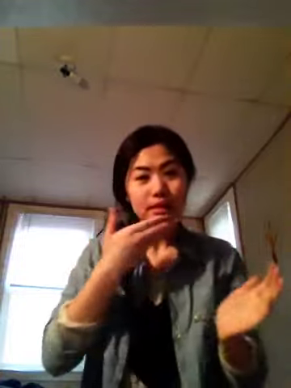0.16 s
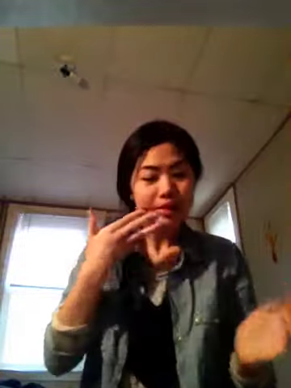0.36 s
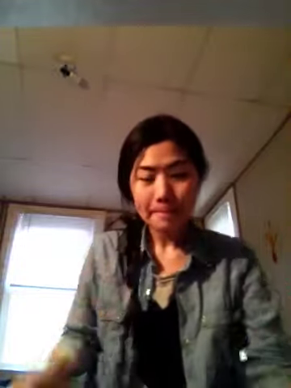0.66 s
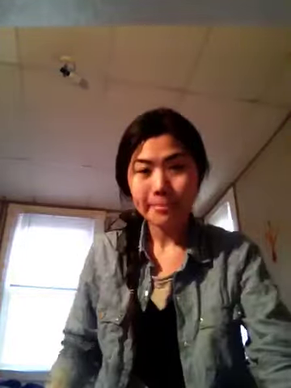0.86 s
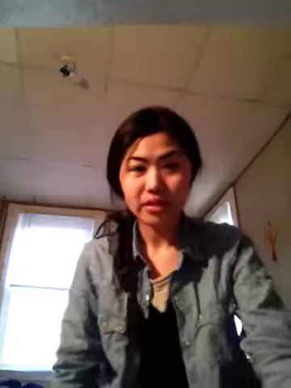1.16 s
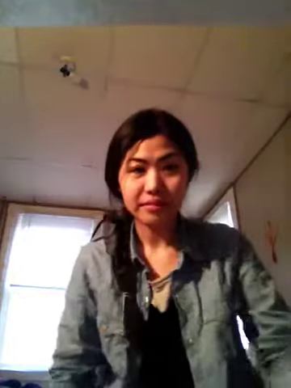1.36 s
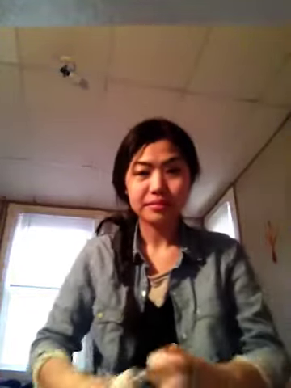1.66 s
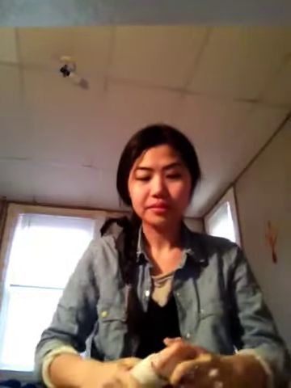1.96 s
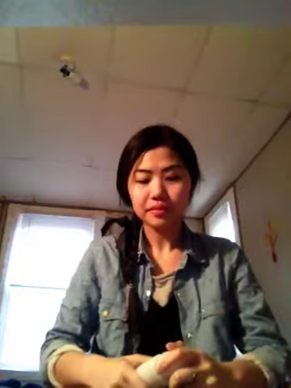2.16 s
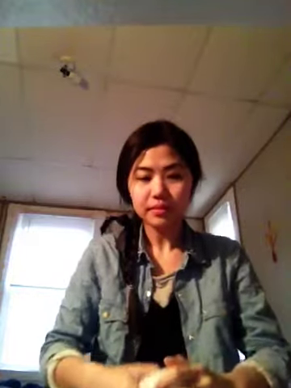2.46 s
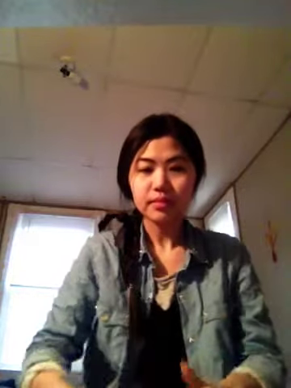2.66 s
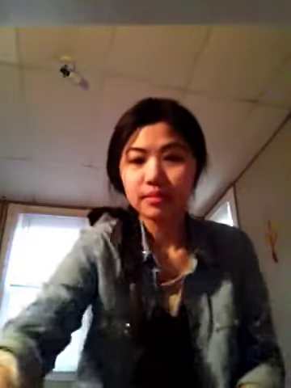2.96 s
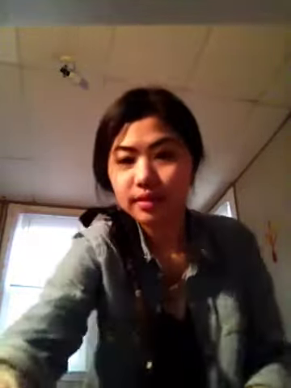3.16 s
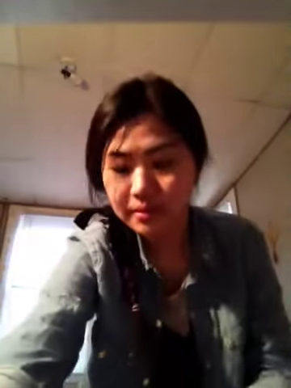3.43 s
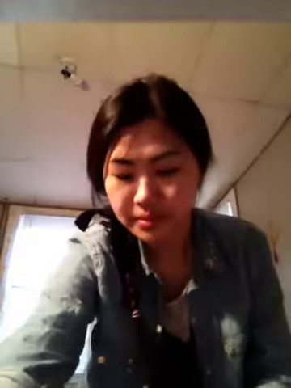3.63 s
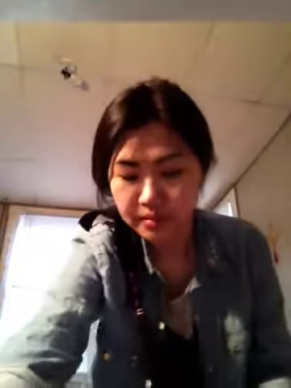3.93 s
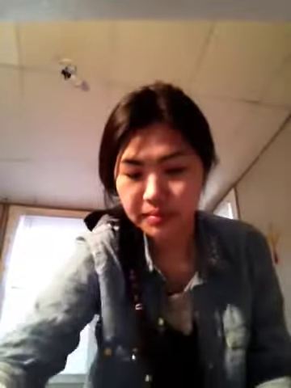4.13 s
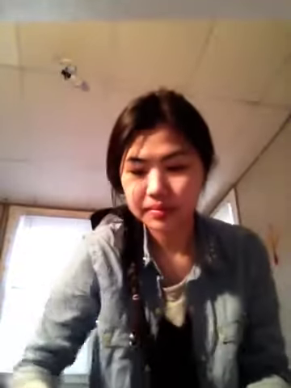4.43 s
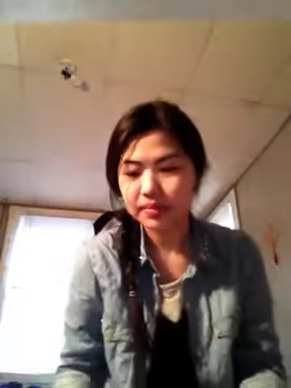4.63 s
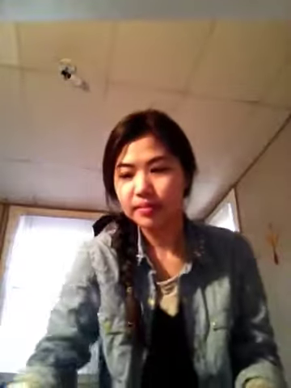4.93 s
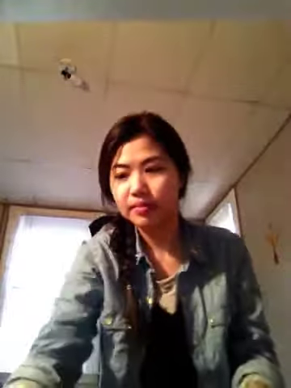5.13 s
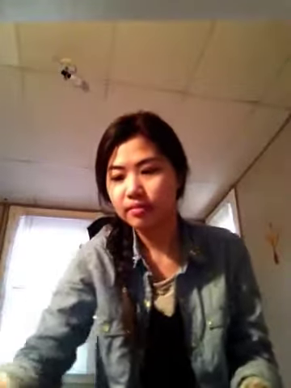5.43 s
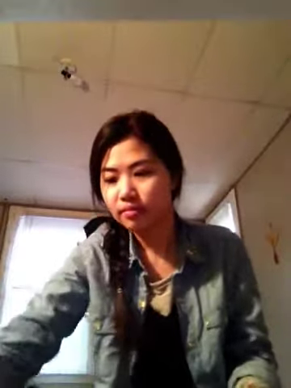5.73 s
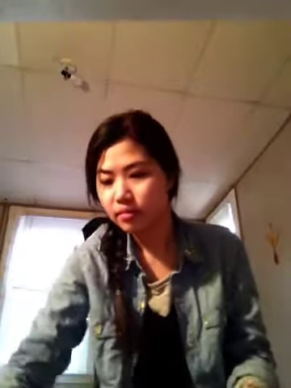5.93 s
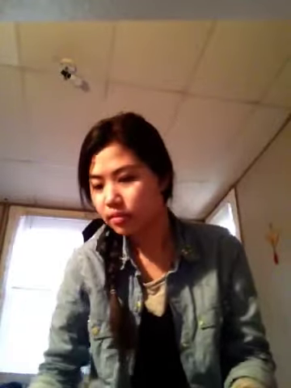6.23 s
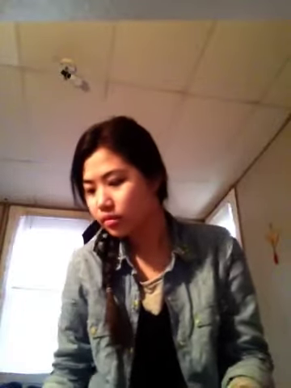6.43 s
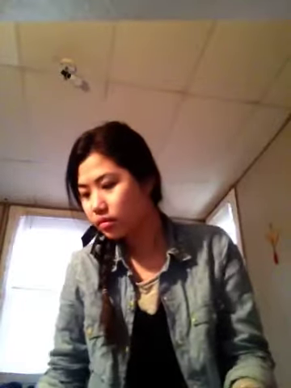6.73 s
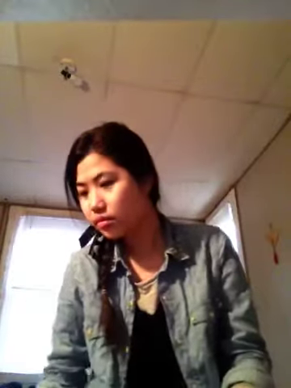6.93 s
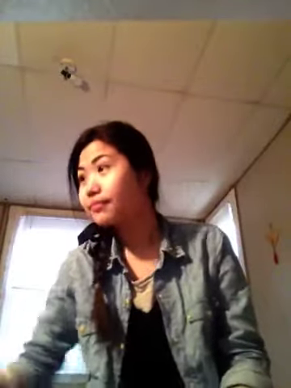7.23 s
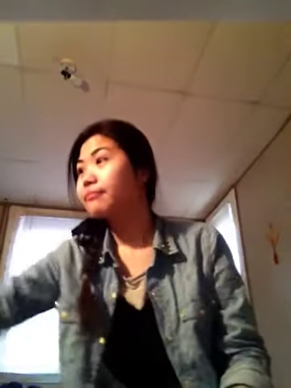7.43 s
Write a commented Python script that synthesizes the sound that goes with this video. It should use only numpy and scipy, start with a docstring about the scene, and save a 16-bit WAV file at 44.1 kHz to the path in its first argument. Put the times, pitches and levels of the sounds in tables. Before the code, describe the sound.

Sleeves rustle softly before a plastic tube and its cap clatter onto a desk and a makeup compact snaps shut twice. After a hard knock, a wooden drawer scrapes out with its contents rattling, then slides back with a thump. Fingers rummage briefly among small jars and cases. It is all heard close up in a small, quiet room with faint hiss and hum.

```python
"""Make-up being sorted at a desk in a small, quiet room, heard close on one microphone on the desk.
A plastic tube and its cap are set down and a compact snaps shut twice; each clicks and rings briefly.
A wooden drawer is knocked, scrapes out with its contents rattling and thumps back against its stop;
then fingers rummage among jars and cases. Sleeves rustle between the moves, and some appliance hums
faintly and unsteadily under the microphone's hiss."""
import sys
import numpy as np
from scipy import signal
from scipy.fft import rfft, irfft, next_fast_len
from scipy.io import wavfile
from scipy.ndimage import uniform_filter1d, minimum_filter1d, map_coordinates

SR = 44100
rng = np.random.default_rng(int(sys.argv[2]) if len(sys.argv) > 2 else 0)


def inscribe(sig):
    """Save sig as 16-bit PCM at rate SR to the path in sys.argv[1].

    A 1-D sig is mono; a 2-D sig holds one channel per row.
    Samples are clipped to [-1, 1] before scaling.
    """
    pcm = np.round(np.clip(np.atleast_2d(sig).T, -1, 1) * 32767)
    wavfile.write(sys.argv[1], SR, pcm.astype(np.int16))


N = 334763
TIME = np.arange(N) / SR
HIT_TIME = np.arange(2 ** 14) / SR
HIT_HZ = np.fft.rfftfreq(len(HIT_TIME), 1 / SR)
HIT_GAIN = np.sqrt(SR / 100)  # levels of hits and touches count their energy over 10 ms
TOP_HZ = 15480  # the recorder's band limit

# Room air and microphone hiss: frequency_hz, level_db
ROOM_TONE = [(25, -44), (69, -30), (113, -6.5), (220, -4.5), (288, -16.5), (348, -12), (719, -18),
             (2410, -19.5), (2910, -21.5), (5120, -21.5), (15400, -25)]
# The room's reverberation: frequency_hz, t60_s
ROOM_DECAY = [(100, .3), (500, 0.22), (1500, 0.21), (6000, 0.24), (14000, 0.22)]
# The appliance's slow drift: time_s, pitch_hz
HUM_PITCH = [(.3, 224.8), (1.55, 233), (2.4, 225), (3.2, 222), (4.5, 209.3), (5.1, 225)]
# Its hum comes forward once: middle_s, length_s, rise_db
HUM_SWELL = (2.88, .85, 9.5)
# Light fingertip and nail touches: start_s, level_db, pitch_hz
TOUCHES = [(.045, -57, 5500), (.143, -59.5, 7380), (.976, -53, 1920), (1.101, -58, 2190),
           (1.296, -60, 1950), (1.548, -60.5, 1945), (2.503, -52, 1035), (2.846, -61.5, 4880)]
# Sleeves and fingers brushing past, and a short rattling scrape just after the desk knock:
# middle_s, length_s, scrape_db, hiss_db
RUSTLES = [(.8, .06, -48, -53), (.985, .41, -65.5, -62.5), (1.152, .036, -52, -51),
           (3.226, .028, -40, -34.5), (4.29, .15, -67, -68), (5.215, .11, -52, -52),
           (5.32, .042, -42.5, -41.5), (5.475, .06, -55, -53), (5.69, .36, -66.5, -62),
           (5.83, .08, -51, -53), (6.105, .05, -56, -57), (6.195, .05, -63, -62)]
# A sleeve catching on the desk's edge: start_s, hiss_db
CATCHES = [(.722, -52), (5.135, -53)]
# The drawer comes out in tugs, then glides: start_s, length_s, scrape_db, hiss_db
TUGS = [(3.302, .094, -43, -41.3), (3.418, .032, -42, -47), (3.478, .219, -44.2, -48.2),
        (3.68, .23, -51.5, -60)]
# Containers chafing in the drawer: middle_s, length_s, level_db, pitch_hz
CHAFES = [(3.385, .045, -44, 1600), (3.452, .025, -44, 1000), (3.57, .08, -49, 1350),
          (4.04, .09, -47, 1730), (4.28, .13, -69, 2000), (5.315, .03, -48, 1400)]
# One shove sends it back, loudest at full speed: start_s, stop_s, scrape_db, hiss_db
SHOVE = (3.895, 4.115, -38, -38.5)
# Colours of the rustles, the drawer's wood each way, and their shared hiss: frequency_hz, level_db
RUSTLE_SCRAPE = [(120, -19.5), (300, -3.5), (600, -0.5), (1150, 3), (1900, 1), (2700, -5), (5000, -27)]
PULL_SCRAPE = [(70, -22), (130, -5.5), (330, -6), (600, -7), (1300, -1.5), (2200, -4), (3500, -16.5),
               (6000, -52.5)]
PUSH_SCRAPE = [(100, -26), (600, -11), (850, 1), (1150, -8), (1750, 4), (2050, -3), (2450, -1.5),
               (3500, -11), (6000, -44)]
RUB_HISS = [(1500, -30.5), (2900, -5.5), (4800, 0.5), (7000, -1), (9500, -12.5), (15000, -24.5)]
# Contacts of each object: start_s, level_db, tilt_db_per_octave
PALM_HITS = [(.929, -54, -1.5), (.953, -44.5, -1.5), (1.28, -57, -3)]
TUBE_HITS = [(1.7225, -31, -0.5), (1.7335, -13.5, 1.5), (1.74, -26, 3), (1.7825, -35, -0.5)]
CAP_HITS = [(1.852, -28.5, -1), (1.862, -36, 0), (1.897, -45.5, -6), (1.944, -43, 1.5)]
COMPACT_HITS = [(2.0525, -29.5, -1), (2.059, -24.5, -0.9), (2.2138, -31.5, -1.5), (2.2327, -15.3, 0)]
DESK_KNOCK = [(3.2082, -19.5, .1)]
DESK_TAPS_AND_RATTLES = [(3.07, -49, 5.5), (3.222, -32, 1), (3.2325, -31, 0), (3.311, -39.5, 1),
                         (3.315, -38, 7), (3.388, -38.5, 3), (3.4505, -41, 2)]
DRAWER_HITS = [(3.511, -44, 2), (3.604, -42.5, 6), (3.631, -42, -4.5), (3.647, -46.5, -0.5),
               (4.085, -37.5, -12.5)]
DRAWER_STOP = (4.0975, -26.7, 0.3)
BOX_HITS = [(3.769, -35, 4.5), (3.7725, -20, 1.5), (3.79, -31, 1)]
CLUTTER_HITS = [(5.172, -43.5, -1), (5.205, -49, 2), (5.797, -40, 1), (5.8195, -39, -2.5), (5.848, -41, -1),
                (5.855, -38, 0), (5.883, -45, 0)]
JAR_HITS = [(5.423, -29.5, 2), (5.442, -46, 4), (5.619, -42.5, 6.5)]
CASE_HITS = [(5.512, -55, 2.5), (5.536, -56, 2.5), (5.561, -53.5, 2.5), (5.584, -57.5, 2.5),
             (5.762, -49.5, 3.5)]
# Spectrum of each object's dense, quickly dying vibration: frequency_hz, level_db
PALM_BODY = [(60, -25), (190, 0), (450, 0), (1300, -19), (4000, -22), (12000, -45)]
TUBE_BODY = [(120, -36), (580, -20), (780, -9), (1170, -11), (1870, 7.5), (2800, -13), (4950, -7),
             (6300, -10), (8000, -19), (15000, -37)]
CAP_BODY = [(200, -29), (700, -18), (1450, 3), (2200, -10), (3300, -17), (4600, -14), (7000, -12),
            (15000, -39.5)]
COMPACT_BODY = [(100, -38), (380, -12), (550, -12), (800, -1), (1330, 2), (2300, -3), (2750, 0), (3500, -5),
                (5200, 0), (8000, -7.5), (15000, -21.5)]
DESK_BODY = [(50, -24), (170, -13), (400, -1), (750, 1.5), (1600, -1.5), (2500, -14.5), (7500, -26),
             (15000, -60)]
DRAWER_BODY = [(45, -36), (90, -7), (180, -7.5), (300, 0), (550, 1), (1000, -7), (5000, -20.5),
               (15000, -45)]
BOX_BODY = [(41, -53.5), (269, 8), (618, -3), (947, 1.5), (1450, -7), (2080, -14), (6990, -26),
            (15000, -58)]
CLUTTER_BODY = [(70, -24), (170, 1), (800, 1), (1580, -.5), (2100, -9), (2750, -3), (3600, -12),
                (8700, -16), (15000, -31)]
JAR_BODY = [(71, -49.5), (120, -8.5), (770, 2), (2400, -13), (6550, -23), (15000, -49)]
# Ringing modes of each object: pitch_hz, level_db, t60_s
DESK_MODES = [(424, -23.5, 0.062), (762, -11, .06), (1148, -13.5, 0.039)]
TUBE_MODES = [(1840, -9, .08), (1925, -13, 0.25), (4957, -19, .08), (6040, -20, .12)]
CAP_MODES = [(1400, -27, 0.09), (1486, -6.5, 0.042), (4700, -21, .02)]
COMPACT_MODES = [(885, -16, .045), (1325, -13, .022), (2675, -17, .01)]
DRAWER_MODES = [(81.3, -27, .5), (113, -17, .28), (184, -12, .15)]
BOX_MODES = [(185, -21, 0.51), (277.5, -17, .06), (965.5, 1, 0.026), (1760, -15.5, 0.051),
             (2440, -9, 0.017)]
CLUTTER_MODES = [(340, -14, .021), (800, -16, .03), (1580, -12, 0.025)]
JAR_MODES = [(795, -8, 0.065), (1222, -6, 0.035), (1820, -14, .03), (2780, -8, 0.034)]
CASE_MODES = [(1195, -3, .03), (2380, -6, .03)]


def amp(db):
    """Decibels to gain."""
    return 10 ** (np.asarray(db) / 20)


def unit_rms(x):
    """Scaled to rms 1."""
    return x / np.sqrt(np.mean(x ** 2) + 1e-20)


def unit_energy(x):
    """Scaled to energy 1."""
    return x / np.linalg.norm(x)


def fade(t, t60):
    """A decay of 60 dB in t60 seconds."""
    return np.exp(-np.log(1000) * t / t60)


def along(points, hz):
    """(frequency_hz, value) points read on a log axis."""
    knots_hz, values = np.transpose(points)
    return np.interp(np.log(hz + 1), np.log(knots_hz + 1), values)


def wobble(rate):
    """A smooth random curve, rate knots a second."""
    return map_coordinates(rng.standard_normal(int(N * rate / SR) + 4), [TIME * rate])


def filtered(x, gain):
    """x times a gain that depends on frequency."""
    size = next_fast_len(N + SR // 2)
    return irfft(rfft(x, size) * gain(np.fft.rfftfreq(size, 1 / SR)), size)[:N]


def coloured(x, spectrum):
    """x shaped by a spectrum, at rms 1."""
    return unit_rms(filtered(x, lambda hz: amp(along(spectrum, hz))))


def room_tone():
    """The quiet room's air and the microphone's hiss: steady coloured noise."""
    return amp(-64.5) * coloured(rng.standard_normal(N), ROOM_TONE)


def appliance(hum_db=-76, drone_db=-79, drone_hz=188):
    """In the background, a wandering hum that swells once, over a fainter, lower drone."""
    def tone(hz):
        return np.sqrt(2) * np.sin(2 * np.pi * np.cumsum(hz) / SR)

    hum_hz = np.interp(TIME, *np.transpose(HUM_PITCH))
    middle, length, rise_db = HUM_SWELL
    swell_db = rise_db * np.exp(-(2 * (TIME - middle) / length) ** 2)
    hum = amp(hum_db + swell_db + wobble(6)) * tone(hum_hz + 1.4 * wobble(4.2))
    drone = amp(drone_db + 3.7 * wobble(4)) * tone(drone_hz + 3 * wobble(4.7))
    return hum + drone


def room_tail(build_up_s=.005):
    """The walls' diffuse answer, of energy 1; each frequency dies at its own speed."""
    hz, t, spectra = signal.stft(rng.standard_normal(len(HIT_TIME)), SR, nperseg=256)
    decay = fade(t, along(ROOM_DECAY, hz)[:, None])
    tail = signal.istft(spectra * decay, SR)[1][:len(HIT_TIME)]
    return unit_energy(tail * (1 - np.exp(-(HIT_TIME / build_up_s) ** 2)))


def in_room(direct, room_db):
    """The direct sound at the microphone, plus the walls' answer."""
    return direct + amp(room_db) * signal.fftconvolve(direct, room_tail())[:N]


def add(track, start, sound):
    """Mix a sound into a track from start seconds on."""
    part = track[max(round(start * SR), 0):][:len(sound)]
    part += sound[:len(part)]


def touches(q=4, t60=.016):
    """Each light touch excites one broad resonance of some small case."""
    track = np.zeros(N)
    for start, db, pitch in TOUCHES:
        resonance = 1j * HIT_HZ / (pitch ** 2 - HIT_HZ ** 2 + 1j * HIT_HZ * pitch / q)
        force = rng.standard_normal(len(HIT_TIME)) * fade(HIT_TIME, t60)
        tick = unit_energy(irfft(rfft(force) * resonance))
        add(track, start, amp(db) * HIT_GAIN * tick)
    return in_room(track, room_db=-9)


def shifting(x, depth_db):
    """Resonances that come and go as the point of contact travels."""
    spectra = signal.stft(x, nperseg=1024)[2]
    patches = uniform_filter1d(rng.standard_normal(spectra.shape), size=5, axis=0)
    patches = unit_rms(uniform_filter1d(patches, size=6, axis=1))
    return unit_rms(signal.istft(spectra * amp(depth_db * patches))[1][:N])


def rub(strokes, colour, slips_per_s, uneven_db, room_db, slip_db=-6, trim_db=-2.55):
    """Friction: tiny slips over fine hiss, under uneven pressure; strokes are relative to trim_db."""
    scrape_gain, hiss_gain = np.linalg.norm(strokes, axis=0)
    pressure = unit_rms(amp(uneven_db * wobble(70)))
    slips = unit_rms((rng.random(N) < slips_per_s / SR) * rng.laplace(size=N))
    grit = unit_rms(amp(slip_db) * slips + rng.standard_normal(N))
    scrape = scrape_gain * coloured(shifting(grit, depth_db=2.2), colour)
    hiss = hiss_gain * coloured(shifting(grit, depth_db=1.2), RUB_HISS)
    return amp(trim_db) * in_room(pressure * (scrape + hiss), room_db)


def arch(middle, length, edge_db=8, roundness=1.45):
    """The gain of a passing contact, which swells and falls around its middle."""
    return amp(-edge_db * np.abs(2 * (TIME - middle) / length) ** roundness)


def rustles(catch_attack_s=.008, catch_t60=.45):
    """Sleeves and fingers brush past, cloth catches twice, and a rattling scrape follows the knock."""
    strokes = [amp([[scrape_db], [hiss_db]]) * arch(middle, length)
               for middle, length, scrape_db, hiss_db in RUSTLES]
    for start, hiss_db in CATCHES:
        t = np.maximum(TIME - start, 0)
        catch = np.minimum(t / catch_attack_s, 1) * fade(t, catch_t60)
        strokes.append(amp([[hiss_db - 7], [hiss_db]]) * catch)
    return rub(strokes, RUSTLE_SCRAPE, slips_per_s=700, uneven_db=2, room_db=-11, slip_db=-9)


def causal(gain):
    """The minimum-phase response with this gain: all of it follows the blow."""
    cepstrum = irfft(np.log(np.maximum(gain, 1e-6)))
    half = len(cepstrum) // 2
    cepstrum[1:half] *= 2
    cepstrum[half + 1:] = 0
    return np.exp(rfft(cepstrum))


def ringing(hz, t60):
    """A mode of energy 1; loose, rattling contact makes its phase stray and blurs its pitch."""
    blur_hz = 3 + .018 * hz
    stray = np.cumsum(rng.standard_normal(len(HIT_TIME))) * np.sqrt(2 * np.pi * blur_hz / SR)
    wave = np.sin(2 * np.pi * (hz * HIT_TIME + rng.random()) + stray)
    envelope = fade(HIT_TIME, t60) * (1 - np.exp(-hz * HIT_TIME))
    edges_hz = [hz / np.sqrt(2), min(hz * np.sqrt(2), TOP_HZ)]
    band = signal.butter(1, edges_hz, "band", fs=SR, output="sos")
    return unit_energy(signal.sosfilt(band, wave * envelope))


def strike(hits, body, modes, chatter_db, chatter_t60, ring_db, room_db):
    """Each contact is a sharp push and brief chatter through the body; modes ring, the room answers."""
    def octaves(hz):
        return np.log2(np.clip(hz, 250, 10000) / 1500)

    track, size = np.zeros(N), len(HIT_TIME)
    for start, db, tilt in hits:
        force = amp(chatter_db) * unit_energy(rng.standard_normal(size) * fade(HIT_TIME, chatter_t60))
        force[0] += 1  # the push
        # Harder, smaller contacts tilt the whole sound towards the treble.
        colour = causal(amp(along(body, HIT_HZ) + tilt * octaves(HIT_HZ)))
        click = unit_energy(irfft(rfft(force) * colour))
        ring = sum(amp(ring_db + mode_db + tilt * octaves(hz) / 2 + rng.normal(0, 1)) * ringing(hz, t60)
                   for hz, mode_db, t60 in modes)
        # The walls gather sound from all sides, so their answer has the object's smooth overall colour.
        echo = signal.fftconvolve(unit_energy(irfft(colour)) + ring, room_tail())[:size]
        at_microphone = unit_energy(click + ring) + amp(room_db) * unit_energy(echo)
        add(track, start, amp(db) * HIT_GAIN * at_microphone)
    return track


def palm():
    """A palm bumps the desk softly and stirs its modes."""
    return strike(PALM_HITS, PALM_BODY, DESK_MODES,
                  chatter_db=8, chatter_t60=.03, ring_db=-3, room_db=-9)


def tube_and_cap():
    """The plastic tube clatters onto the desk near the microphone, then its cap."""
    tube = strike(TUBE_HITS, TUBE_BODY, TUBE_MODES,
                  chatter_db=8, chatter_t60=.01, ring_db=-4, room_db=-9)
    cap = strike(CAP_HITS, CAP_BODY, CAP_MODES,
                 chatter_db=5, chatter_t60=.012, ring_db=5, room_db=-7.5)
    return tube + cap


def compact():
    """The compact's catch ticks, then snaps, twice over."""
    return strike(COMPACT_HITS, COMPACT_BODY, COMPACT_MODES,
                  chatter_db=7, chatter_t60=.011, ring_db=-2, room_db=-11)


def knock_and_rattle():
    """A faint tap on the desk, then one hard knock and its rebounds, then the drawer rattling as it is pulled."""
    knock = strike(DESK_KNOCK, DESK_BODY, DESK_MODES,
                   chatter_db=-5, chatter_t60=.04, ring_db=-6, room_db=-12)
    rattle = strike(DESK_TAPS_AND_RATTLES, DESK_BODY, DESK_MODES,
                    chatter_db=6.5, chatter_t60=.025, ring_db=-6, room_db=-12.5)
    return knock + rattle


def drawer_pull(attack_s=.045, release_t60=.11, brighten_db_per_s=31):
    """The drawer rubs out along its rails; within each tug the hiss grows and the scrape fades."""
    strokes = []
    for start, length, scrape_db, hiss_db in TUGS:
        t = TIME - start
        grip = np.clip(t / attack_s, 0, 1) * fade(np.maximum(t - length, 0), release_t60)
        bright_db = brighten_db_per_s * (np.clip(t, 0, length) - length / 2)
        strokes.append(grip * amp([scrape_db - bright_db, hiss_db + bright_db]))
    return rub(strokes, PULL_SCRAPE, slips_per_s=2500, uneven_db=1.6, room_db=-9.5)


def chafing(q=4, uneven_db=3):
    """Loose containers rub together in fits, each sounding one hollow resonance."""
    track = np.zeros(N)
    for middle, length, db, pitch in CHAFES:
        peak = signal.iirpeak(pitch, q, fs=SR)
        note = signal.lfilter(*peak, signal.lfilter(*peak, rng.standard_normal(N)))
        track += amp(db) * arch(middle, length) * unit_rms(note)
    track *= unit_rms(amp(uneven_db * wobble(120)))
    return in_room(track, room_db=-10)


def drawer_bumps(gap_s=.0053, loss_db=4.5, brighten_db_per_octave=1.2):
    """The drawer bumps dully, then hits its stop and rebounds twice, weaker and brighter each time."""
    start, db, tilt = DRAWER_STOP
    stop_hits = [(start + k * gap_s, db - loss_db * k ** .5, tilt + brighten_db_per_octave * k ** .5)
                 for k in range(3)]
    return strike(list(DRAWER_HITS) + stop_hits, DRAWER_BODY, DRAWER_MODES,
                  chatter_db=11.5, chatter_t60=.089, ring_db=.5, room_db=-12.5)


def toppling_box():
    """A box falls over in the drawer in three quick contacts."""
    return strike(BOX_HITS, BOX_BODY, BOX_MODES,
                  chatter_db=11, chatter_t60=.052, ring_db=-4.5, room_db=-14)


def drawer_push(growth=.8, release_t60=.09):
    """The closing drawer speeds up evenly, rubbing ever louder until it meets its stop."""
    start, stop, scrape_db, hiss_db = SHOVE
    speed = np.clip((TIME - start) / (stop - start), 0, 1)
    envelope = speed ** growth * fade(np.maximum(TIME - stop, 0), release_t60)
    stroke = amp([[scrape_db], [hiss_db]]) * envelope
    return rub([stroke], PUSH_SCRAPE, slips_per_s=2500, uneven_db=2, room_db=-22)


def rummaging():
    """Hands jostle the containers; a jar is knocked and a small case rocks."""
    clutter = strike(CLUTTER_HITS, CLUTTER_BODY, CLUTTER_MODES,
                     chatter_db=18, chatter_t60=.029, ring_db=3.5, room_db=-6)
    jar = strike(JAR_HITS, JAR_BODY, JAR_MODES,
                 chatter_db=9, chatter_t60=.022, ring_db=0, room_db=-14)
    case = strike(CASE_HITS, JAR_BODY, CASE_MODES,
                  chatter_db=8, chatter_t60=.014, ring_db=1, room_db=-11)
    return clutter + jar + case


def scene():
    """Everything at one microphone on the desk, in mono."""
    background = room_tone() + appliance()
    desk = touches() + rustles() + palm() + tube_and_cap() + compact() + knock_and_rattle()
    drawer = drawer_pull() + chafing() + drawer_bumps() + toppling_box() + drawer_push()
    return (background + desk + drawer + rummaging())[None]


def gain_control(x, threshold=.55, depth_db=-3, hold_s=.5, release_s=.2):
    """A loud peak turns the recorder's gain down at once; it stays down a while, then creeps back."""
    needed = np.clip(threshold / (np.abs(x) + 1e-9), amp(depth_db), 1)
    half_hold, half_release = int(hold_s * SR / 2), int(release_s * SR / 2)
    held = minimum_filter1d(needed, 2 * half_hold + 1, origin=half_hold)
    eased = uniform_filter1d(held, 2 * half_release + 1, origin=half_release)
    return x * np.minimum(held, eased)


def record(dry, low_cut_hz=52, ceiling=.75):
    """The recorder sheds deep bass, ducks after loud clicks, rounds their peaks and cuts the top end."""
    low_cut = signal.butter(2, low_cut_hz, "high", fs=SR, output="sos")
    ducked = gain_control(signal.sosfilt(low_cut, dry[0]))
    rounded = ducked / (1 + (ducked / ceiling) ** 6) ** (1 / 6)
    return filtered(rounded, lambda hz: (hz < TOP_HZ) * hz / np.hypot(hz, low_cut_hz))[None]


dry = scene()
out = record(dry)
inscribe(out)
```